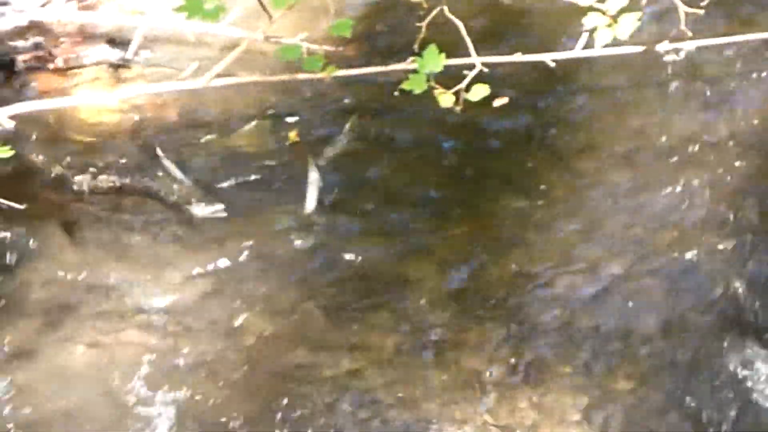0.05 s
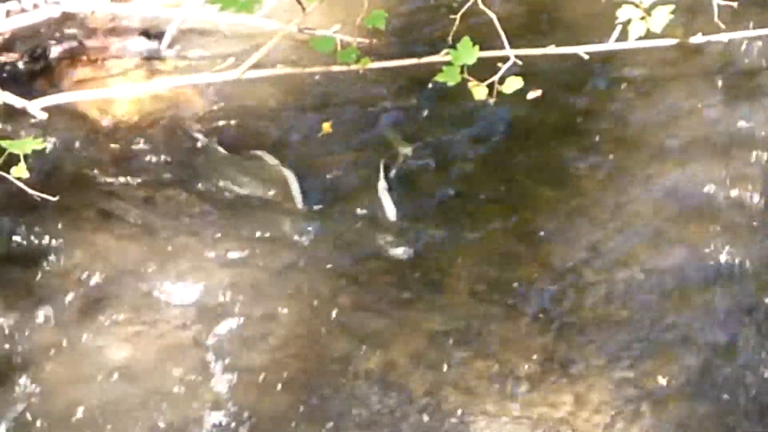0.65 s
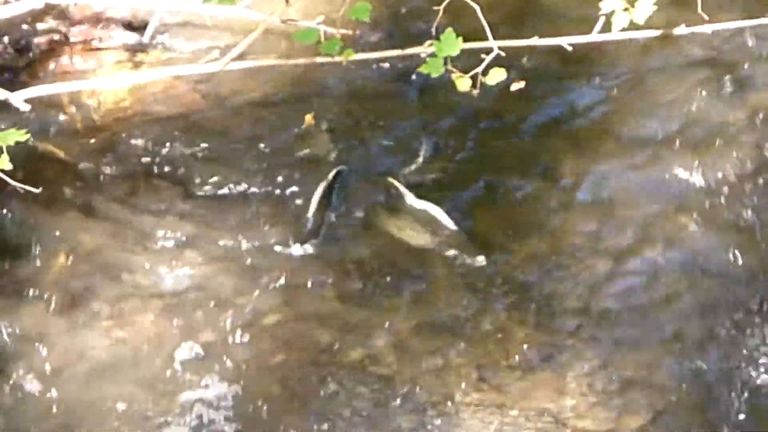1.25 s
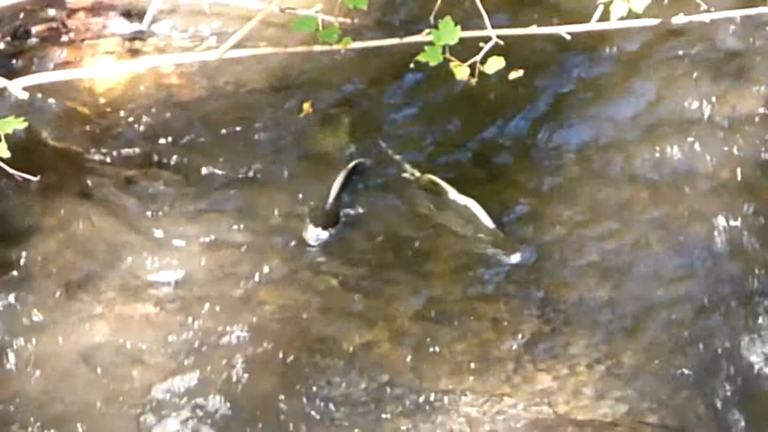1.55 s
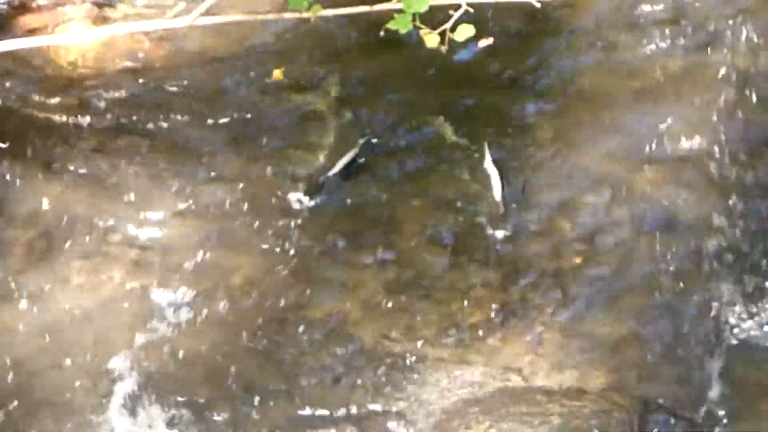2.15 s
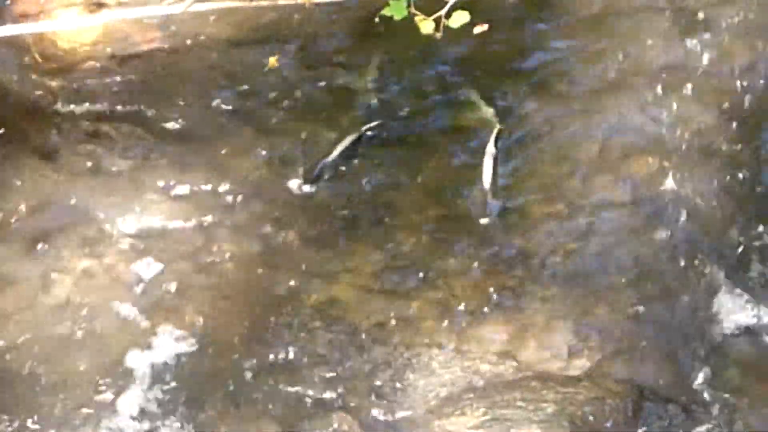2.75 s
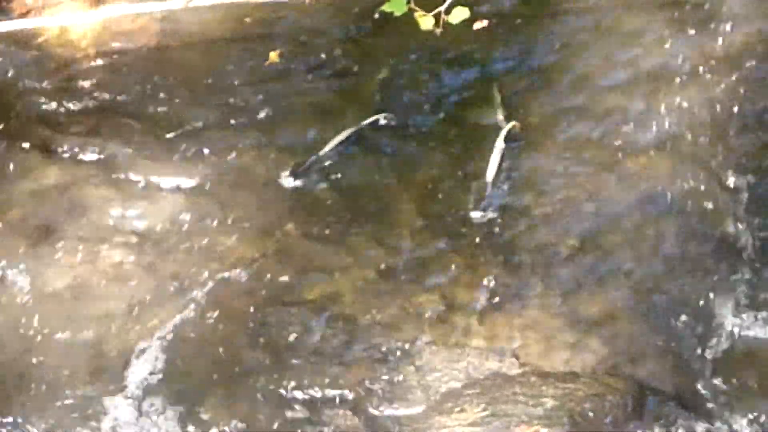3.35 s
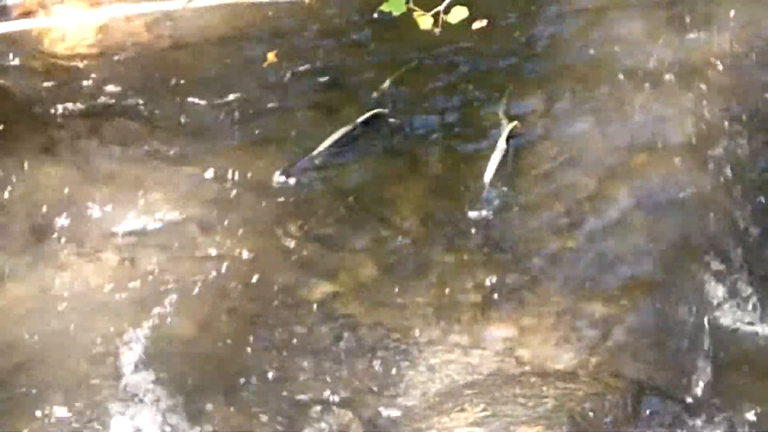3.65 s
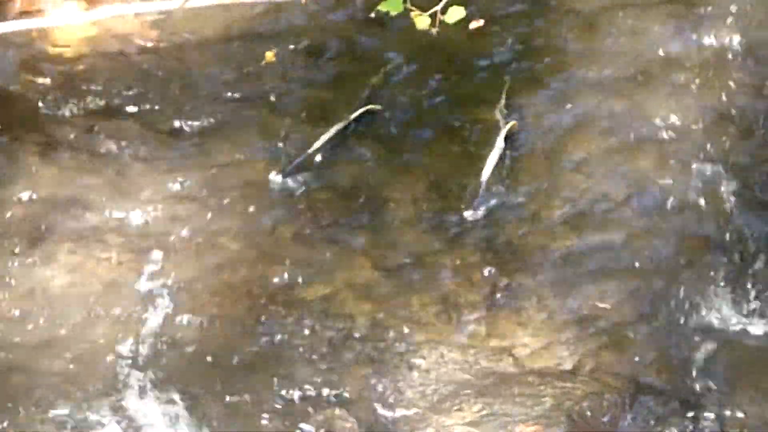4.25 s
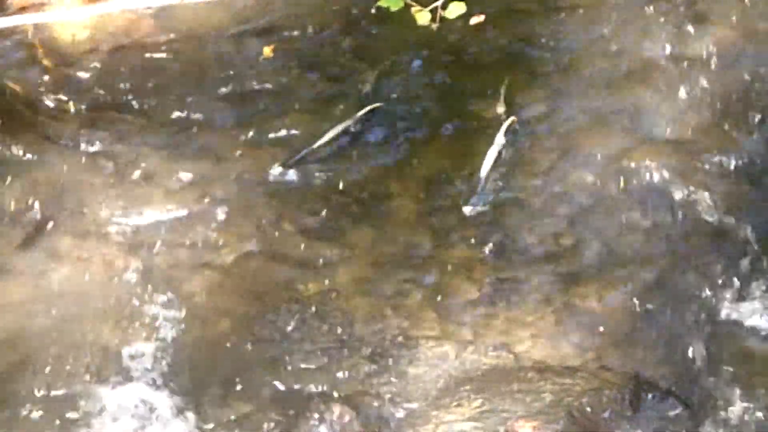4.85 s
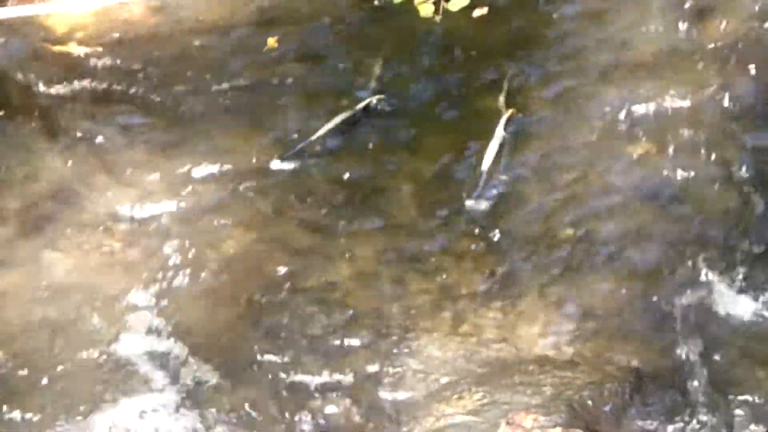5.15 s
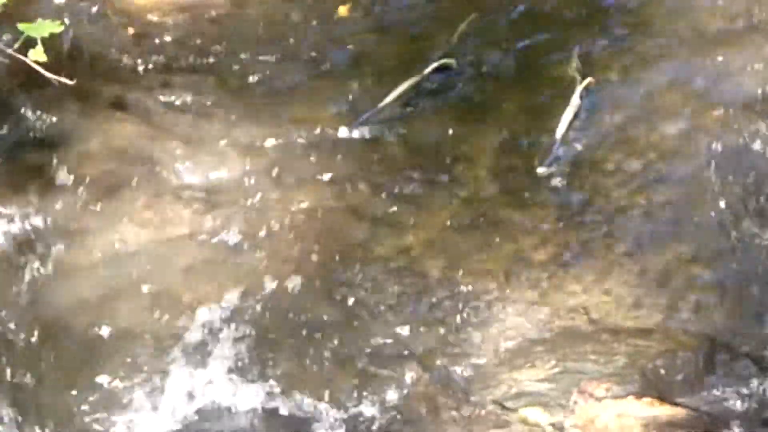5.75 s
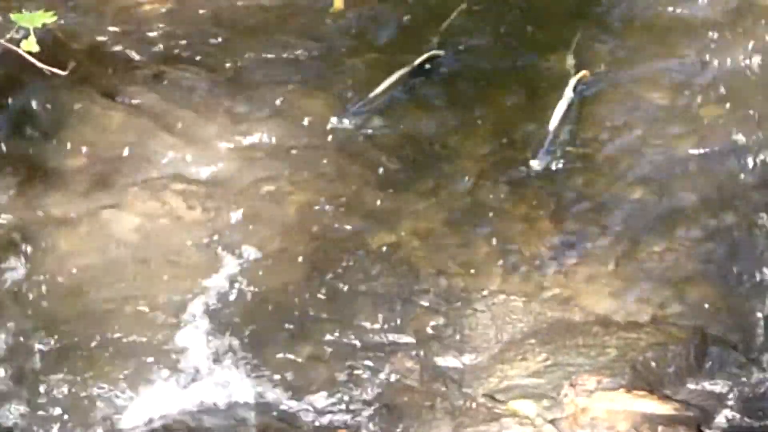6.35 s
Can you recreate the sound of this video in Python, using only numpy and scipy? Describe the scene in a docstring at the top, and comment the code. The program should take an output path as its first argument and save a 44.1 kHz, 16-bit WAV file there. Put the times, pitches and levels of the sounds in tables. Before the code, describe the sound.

A shallow creek runs over stones outdoors, making a steady, even rush full of tiny bubbles. Soft gurgles and a few closer plinks come through the flow. After about five seconds a hand shifts on the camera, giving a cluster of small plastic ticks and a short scrape, with one more tick at the very end. The water carries on unchanged, heard through a single nearby microphone.

```python
"""A shallow creek runs over stones: a steady rush full of small ringing air bubbles, with gurgling
surges and a few nearer plinks. Late on, a hand shifts on a camera: the plastic case ticks,
and a finger brushes and scrapes across it. The camera's electronics whine faintly,
and its single microphone misses a narrow band of the treble."""
import sys
import numpy as np
from scipy import signal
from scipy.fft import rfft, irfft, next_fast_len
from scipy.io import wavfile
from scipy.ndimage import uniform_filter1d, map_coordinates

SR = 44100
rng = np.random.default_rng(int(sys.argv[2]) if len(sys.argv) > 2 else 0)


def transcribe(u):
    """Save the signal u as a 16-bit wav file named by the first command-line argument.

    u: samples, shape (n,) or (channels, n), limited to [-1, 1]; the rate is SR.
    q: integer samples, one column per channel.
    """
    v = np.clip(np.atleast_2d(u).T, -1, 1)
    q = np.round(v * 32767).astype(np.int16)
    wavfile.write(sys.argv[1], SR, q)


N = 291060
T = np.arange(N) / SR

# The notes the plastic case rings at. Each row: pitch in Hz, level in dB, seconds to fade by 60 dB.
CASE_NOTES = [(1605, 4, 0.025), (2880, 9.5, 0.0041), (4120, -1.5, 0.0082), (4820, 1, 0.0073),
              (6040, 0, 0.0068), (6700, -2.5, 0.0067), (10300, -9, 0.0054), (12340, -12, 0.005)]
# Ticks of the case and hard catches of the finger on it.
# Each row: start in seconds, ring level in dB, favoured pitch in Hz, crack level in dB.
CASE_TICKS = [(5.087, -36, 11500, -37), (5.0913, -27, 12400, -30.5), (5.1112, -30, 11000, -30),
              (5.1133, -20, 4850, -29.5), (5.282, -17, 5450, -32), (5.283, -26, 1600, -38),
              (5.288, -18, 5170, -33), (5.3067, -21, 2900, -44), (5.3208, -20, 4100, -44),
              (5.3331, -17, 2900, -44), (5.345, -17.5, 4400, -43), (5.3533, -25, 4750, -40),
              (5.6034, -13.5, 6300, -26.8), (5.6076, -17, 3000, -35), (5.636, -20, 3800, -49),
              (5.706, -22.5, 4400, -32.5), (5.7468, -31, 4700, -34), (5.8737, -25.5, 4800, -34),
              (6.557, -28, 1900, -44), (6.5774, -14, 7500, -24), (6.5965, -31.5, 4550, -48)]
# Strokes of a finger over the case.
# Each row: start, rise, hold and release in seconds, creak level in dB, hiss level in dB.
FINGER_STROKES = [(5.088, .004, 0.022, .004, -59, -44), (5.282, 0.042, 0.022, 0.036, -33, -55),
                  (5.582, .008, 0.163, .008, -47, -53.5), (6.547, .005, 0.035, .02, -47.5, -60)]
# The tone of a hard scrape. Each row: frequency in Hz, level in dB.
SCRAPE_TONE = [(1000, -38), (2050, -19), (2400, 1), (2900, -0.5), (3060, 6.5), (3250, -10), (4050, -7),
               (4700, -6), (5020, 2), (5250, -2.5), (5900, -3.5), (6700, -8.5), (8700, -30), (9900, -15),
               (11000, -26), (14000, -32)]
# The tone of a light brush or a crack. Each row: frequency in Hz, level in dB.
BRUSH_TONE = [(1500, -21), (3500, 6.5), (6500, 2.5), (8800, 1.5), (10300, -0.5), (12000, -6.5),
              (14000, -16)]
# The clearest bubbles near the bank. Each row: start in seconds, level in dB, pitch in Hz,
# ring length in cycles, fraction by which the pitch rises over that length.
NEAR_BUBBLES = [(.1603, -31, 1930, 7, .02), (0.4988, -30.5, 1820, 9.1, .02), (.531, -27.5, 4650, 4, .02),
                (.5315, -35, 4000, 14, .02), (0.982, -34, 6300, 6, .02), (1.043, -28, 4400, 3, .02),
                (1.119, -34, 2830, 6, .02), (1.1733, -29, 2110, 4.5, .02), (1.4165, -35, 2830, 9, .02),
                (1.469, -40.5, 510, 5.7, .04), (1.570, -30, 5200, 6, .02), (1.722, -32.5, 6150, 6, .02),
                (2.205, -33, 5650, 7, .02), (2.2444, -32.5, 2440, 6, .02), (2.421, -45, 290, 3.9, 0.046),
                (2.436, -35, 1200, 6.3, .03), (2.454, -34.5, 2000, 7, .02), (2.610, -30, 1490, 5.7, .02),
                (2.7605, -31, 2720, 6, .02), (3.2148, -33.5, 5300, 9, .02), (3.490, -32, 5070, 7, .02),
                (3.582, -29, 4600, 4.5, .02), (3.61, -44, 377, 5, .04), (3.694, -33, 3870, 7, .02),
                (3.7453, -25.5, 3050, 3.6, .02), (3.895, -46, 364, 4.6, .04), (3.963, -36, 1034, 9, .03),
                (4.068, -32, 4000, 5, .02), (4.094, -32, 2360, 9, .02), (4.515, -39, 341, 3.8, 0.07),
                (4.6138, -26, 2830, 4.7, .02), (4.813, -28.5, 6150, 5.1, .02), (5.218, -34.5, 693, 6, .03),
                (5.229, -36, 790, 11.2, 0.14), (5.869, -45, 302, 6.8, .04), (5.9233, -31.5, 5850, 11, .02)]
# Gurgling surges. Each row: middle time in seconds, level in dB, middle pitch in Hz.
WATER_SURGES = [(.12, -50, 637), (.31, -49.5, 1070), (.80, -52, 720), (1.66, -52, 783), (1.80, -49.5, 750),
                (2.45, -51, 880), (3.0, -50, 708), (3.59, -51, 687), (5.28, -52, 730), (5.66, -49.5, 856)]
# The tone of water running over stones. Each row: frequency in Hz, level in dB.
WATER_TONE = [(30, -35), (120, -30), (195, -23), (300, -6.5), (535, -5), (710, -0.26), (1130, -2),
              (1400, -4), (3800, -7), (4500, -10), (6600, -13), (8700, -29), (10200, -22.5), (11800, -29.5),
              (13600, -31.5)]


def amp(db):
    """Turn decibels into a number to multiply by."""
    return 10 ** (np.asarray(db) / 20)


def unit(x):
    """Scale a signal so its average size (rms) is 1."""
    return x / np.sqrt(np.mean(x ** 2) + 1e-20)


def filtered(x, response):
    """Turn each frequency up or down by the gain response(hz)."""
    length = next_fast_len(N + 8192)
    return irfft(rfft(x, length) * response(np.fft.rfftfreq(length, 1 / SR)), length)[:N]


def coloured(x, tone):
    """Shape a sound with a tone table, then scale it to average size 1."""
    points_hz, db = np.transpose(tone)
    return unit(filtered(x, lambda hz: amp(np.interp(np.log(hz + 1), np.log(points_hz), db))))


def bass_cut(x, corner_hz):
    """Take away the bass, which small things barely give off."""
    return filtered(x, lambda hz: (1j * hz / (1j * hz + corner_hz)) ** 2)


def wobble(per_second):
    """A smooth curve through evenly spaced random values."""
    return unit(map_coordinates(rng.standard_normal(int(N * per_second / SR) + 4), [T * per_second]))


def placed(times, sounds):
    """Add up short sounds (one per row), each starting at its own time."""
    index = np.round(np.asarray(times) * SR).astype(int)[:, None] + np.arange(sounds.shape[1])
    return np.bincount(np.maximum(index, 0).ravel(), sounds.ravel(), N)[:N]


def whine(db, hz=15625):
    """The camera's electronics give off a faint, thin tone."""
    return amp(db) * unit(np.sin(2 * np.pi * hz * T))


def case_ticks():
    """Each tick is a sharp crack and a short ring of the case, favouring notes near the tick's pitch."""
    t = np.arange(SR // 40) / SR
    hz, note_db, fade_s = np.transpose(CASE_NOTES)
    starts, ring_db, pitch, crack_db = np.transpose(CASE_TICKS)
    octaves_away = np.abs(np.log2(hz / pitch[:, None]))
    weights = amp(note_db - 20 * octaves_away)
    weights /= np.linalg.norm(weights, axis=1, keepdims=True)
    phase = 2 * np.pi * rng.random((len(starts), len(hz), 1))
    envelope = amp(-60 * t / fade_s[:, None]) * (1 - np.exp(-t / 0.00015))
    notes = envelope * np.sin(2 * np.pi * hz[:, None] * t + phase)
    rings = amp(ring_db)[:, None] * np.sum(weights[:, :, None] * notes, axis=1)
    bursts = placed(starts, amp(crack_db)[:, None] * amp(-60 * t / 0.0079))
    return placed(starts, rings) + bursts * coloured(rng.standard_normal(N), BRUSH_TONE)


def skin_slips(per_second=220, scatter_db=1, fade_s=0.0012, rub_db=-12, count=3000):
    """Sliding skin sticks and lets go in small, uneven jerks, with a steady rub between them."""
    gap, size = rng.random((count, 2)).T
    times = np.cumsum(.5 + gap) / per_second
    age = np.arange(SR // 80) / SR / fade_s
    jerks = amp(scatter_db * (2 * size - 2))[:, None] * np.sqrt(age) * np.exp(-age)
    return unit(placed(times, jerks) + amp(rub_db))


def finger():
    """A finger slides over the case: hard drags make it creak, light ones hiss."""
    creak, hiss = np.zeros((2, N))
    for start, rise, hold, release, creak_db, hiss_db in FINGER_STROKES:
        pressure = np.interp(T, start + np.cumsum([0, rise, hold, release]), [0, 1, 1, 0])
        creak += amp(creak_db) * pressure
        hiss += amp(hiss_db) * pressure
    grip = skin_slips()
    scrape = coloured(rng.standard_normal(N), SCRAPE_TONE)
    brush = coloured(rng.standard_normal(N), BRUSH_TONE)
    return grip * (creak * scrape + hiss * brush)


def bubbles(times, hz, size, cycles, rise, samples):
    """Each bubble rings for some cycles, its pitch rising as it nears the surface."""
    t = np.arange(samples) / SR
    turns = hz[:, None] * t
    age = turns / np.reshape(cycles, (-1, 1))
    envelope = np.exp(-age) * (1 - np.exp(-2 * turns)) * (1 - (t / t[-1]) ** 2)
    ring = np.sin(2 * np.pi * turns * (1 + rise * age / 2))
    return placed(times, size[:, None] * envelope * ring)


def stray_bubbles(db, low_hz, high_hz, db_per_octave, scatter_db, count):
    """Soft single bubbles come at random, from round plops to small plinks that peak higher."""
    when, pitch, strength = rng.random((count, 3)).T
    octaves = np.log2(high_hz / low_hz) * (np.arange(count) + pitch) / count
    size = amp(db + db_per_octave * octaves + scatter_db * (2 * strength - 6))
    return bubbles(when * N / SR, low_hz * 2 ** octaves, size, cycles=7.1, rise=0.018, samples=3000)


def plinks():
    """Single bubbles close to the bank stand out from the rush."""
    starts, db, hz, cycles, rise = np.transpose(NEAR_BUBBLES)
    return bubbles(starts, hz, amp(db), cycles, rise[:, None], samples=3000)


def surges(half_length_s=0.03, spread_octaves=.13, count=12):
    """Now and then water slops over a stone and traps a cluster of larger bubbles, alike in size."""
    out = np.zeros(N)
    for middle, db, hz in WATER_SURGES:
        when, pitch = rng.uniform(-1, 1, (count, 2)).T
        starts = middle + half_length_s * when - 4 / hz  # four cycles early, to centre the ringing
        pitches = hz * 2 ** (spread_octaves * pitch)
        cluster = bubbles(starts, pitches, np.ones(count), cycles=8.9, rise=0.028, samples=2400)
        average_size = np.sqrt(np.sum(cluster ** 2) / (2 * half_length_s * SR))
        out += amp(db) * cluster / average_size
    return out


def spray(db, spread_db, corner_hz, count=900):
    """Tiny droplets fall back on the water with a fine crackle."""
    when, strength = rng.random((count, 2)).T
    t = np.arange(SR // 200) / SR
    size = amp(spread_db * strength ** 30)  # only a few drops are louder than the rest
    drops = size[:, None] * np.exp(-t / 0.0011) * rng.standard_normal((count, len(t)))
    crackle = coloured(placed(when * N / SR, drops), WATER_TONE)
    return amp(db) * unit(bass_cut(crackle, corner_hz))


def babble(db, low_hz, high_hz, cycles, spread_db, count):
    """Water breaking over stones folds in a cloud of bubbles of many sizes."""
    when, pitch, strength, life = rng.random((count, 4)).T
    hz = low_hz * (high_hz / low_hz) ** pitch
    # Small bubbles die sooner, so they start stronger to make up for it.
    size = hz / high_hz * amp(spread_db * strength ** 5)
    cloud = bubbles(when * N / SR, hz, size, cycles * 2 ** (life - .5), rise=0.047, samples=1200)
    return amp(db) * coloured(cloud, WATER_TONE)


def rush(db, patchy_db):
    """Countless far splashes blend into a rush whose tone shifts in brief patches."""
    grid = signal.stft(rng.standard_normal(N), nperseg=512)[2]  # noise split up by pitch and time
    patches = uniform_filter1d(rng.standard_normal(grid.shape), size=14, axis=0)  # smooth over pitch
    patches = uniform_filter1d(patches, size=9, axis=1)  # smooth over time
    splashes = signal.istft(grid * amp(patchy_db * unit(patches)), nperseg=512)[1][:N]
    return amp(db) * coloured(splashes, WATER_TONE)


def scene():
    """Mix the creek, the hand on the camera and the whine into one channel."""
    gurgle = babble(db=-52.5, low_hz=280, high_hz=1593, cycles=5.8, spread_db=7.5, count=2000)
    tinkle = babble(db=-50.0, low_hz=1396, high_hz=7290, cycles=7.0, spread_db=9.0, count=4200)
    strays = stray_bubbles(db=-47, low_hz=619, high_hz=6060, db_per_octave=0.5, scatter_db=2.0, count=18)
    flow = amp(0.13 * wobble(2.69) + 0.08 * wobble(8.2))  # the level wavers very slightly
    splashes = rush(db=-43.5, patchy_db=0.68)
    droplets = spray(db=-61.5, spread_db=3.0, corner_hz=9000)
    creek = flow * (splashes + gurgle + tinkle + droplets)
    hand = bass_cut(case_ticks() + finger(), corner_hz=480)
    return (creek + surges() + strays + plinks() + hand + whine(db=-68))[None]


def record(dry):
    """One microphone feeds both channels; it loses a narrow band of treble and the very highest sounds."""
    notch_hz, notch_width_hz = 7930, 570
    soft_top_hz, top_hz = 14200, 15830

    def response(hz):
        notch = np.hypot(hz - notch_hz, 20) / np.hypot(hz - notch_hz, notch_width_hz)
        soft_top = 1 / np.sqrt(1 + (hz / soft_top_hz) ** 48)
        return notch * soft_top * (hz < top_hz)

    mono = filtered(dry[0], response)
    return np.array([mono, mono])


dry = scene()
out = record(dry)
transcribe(out)
```